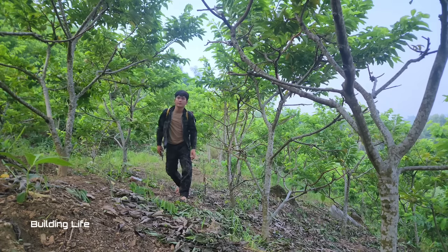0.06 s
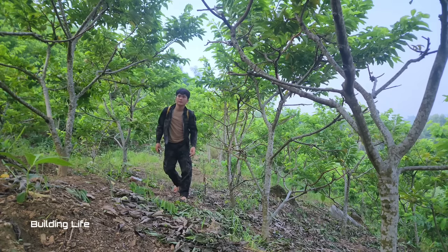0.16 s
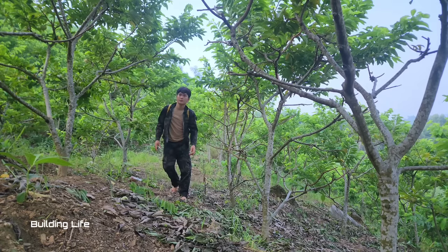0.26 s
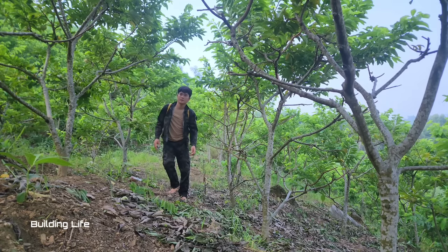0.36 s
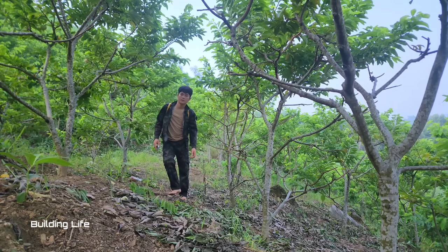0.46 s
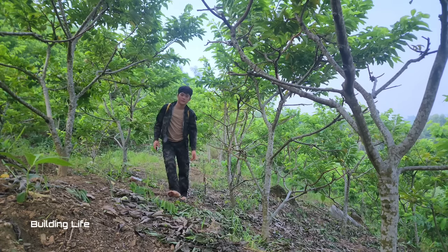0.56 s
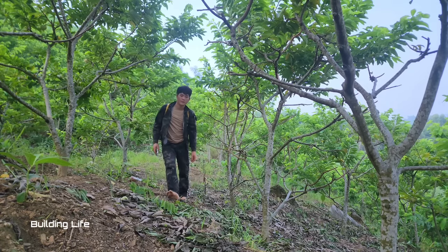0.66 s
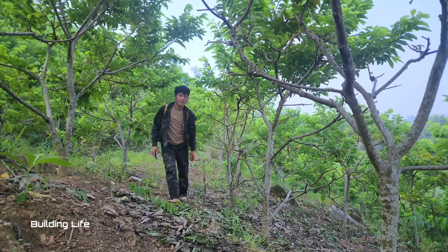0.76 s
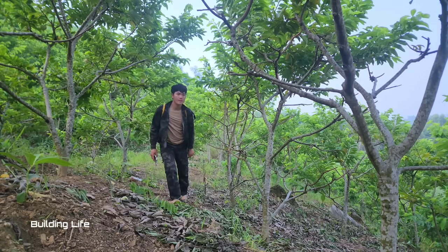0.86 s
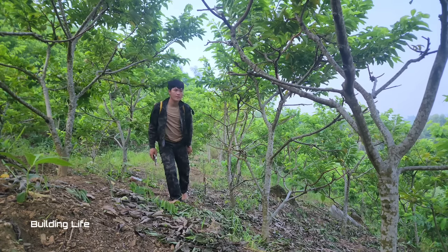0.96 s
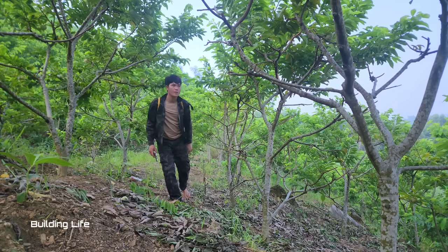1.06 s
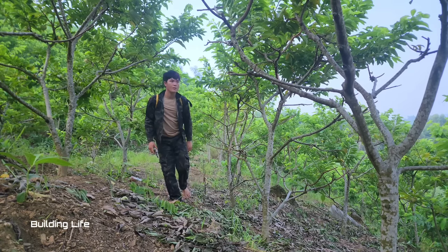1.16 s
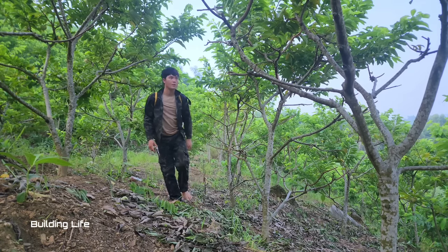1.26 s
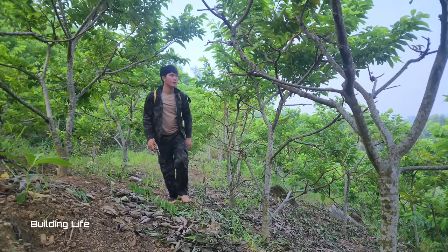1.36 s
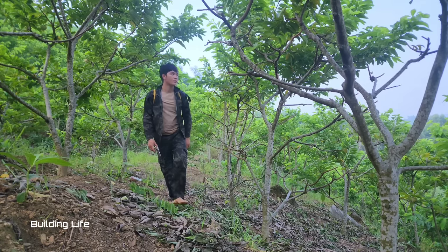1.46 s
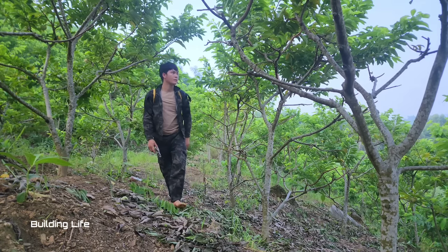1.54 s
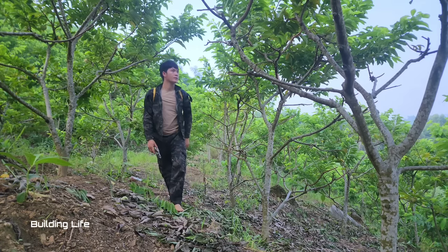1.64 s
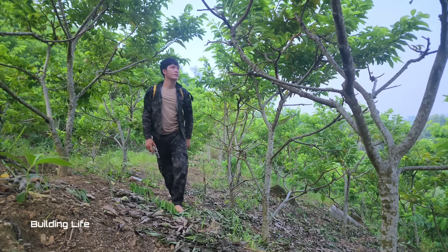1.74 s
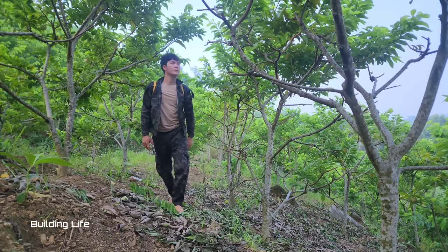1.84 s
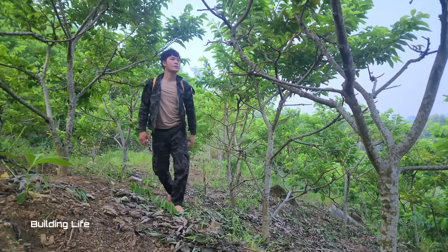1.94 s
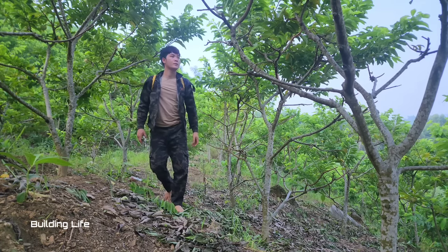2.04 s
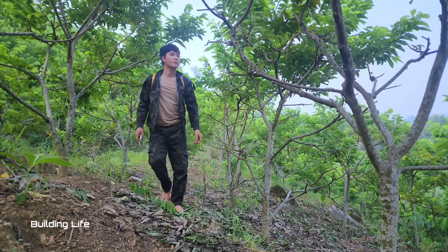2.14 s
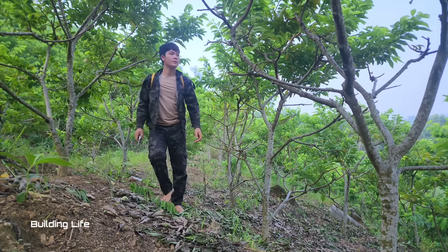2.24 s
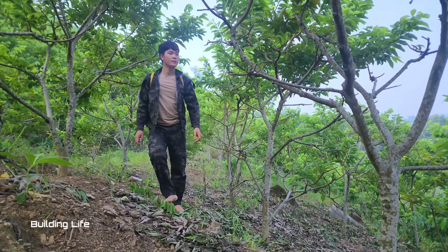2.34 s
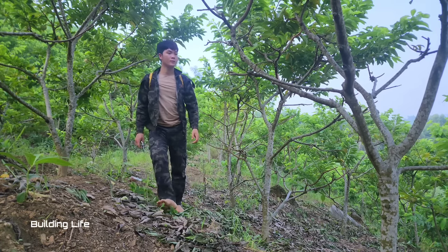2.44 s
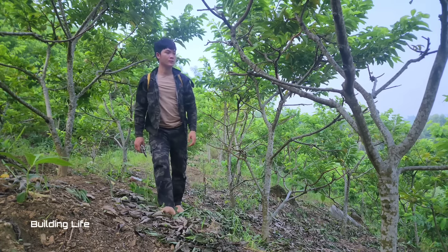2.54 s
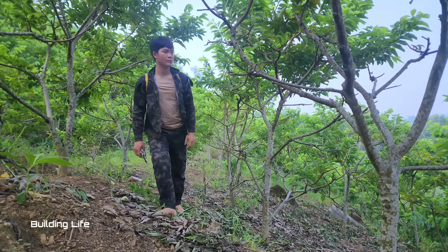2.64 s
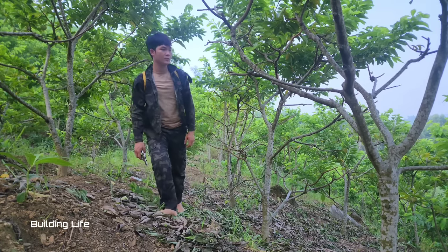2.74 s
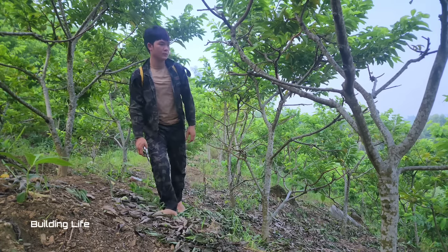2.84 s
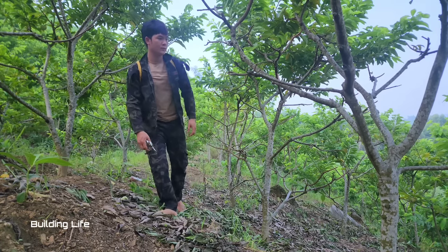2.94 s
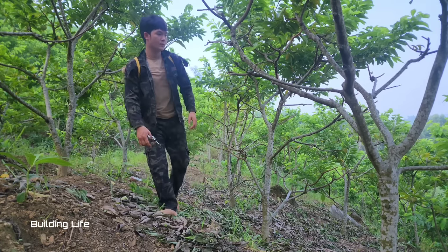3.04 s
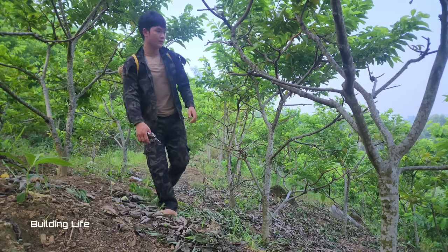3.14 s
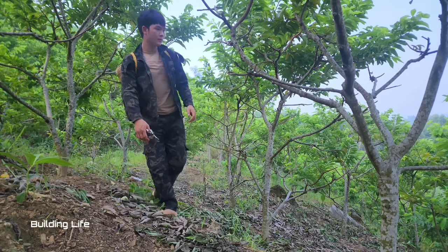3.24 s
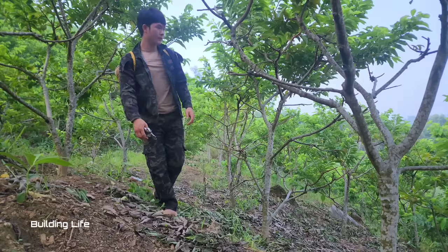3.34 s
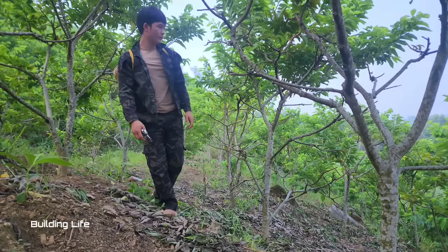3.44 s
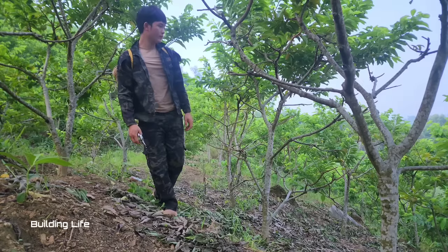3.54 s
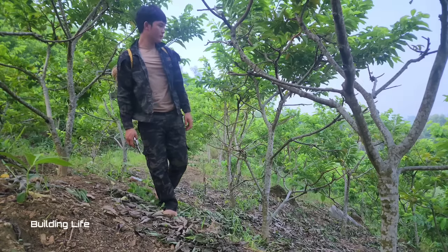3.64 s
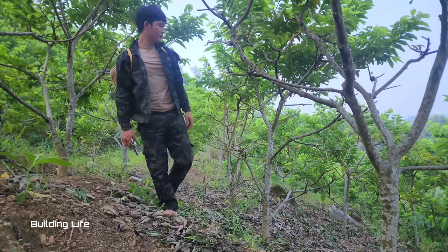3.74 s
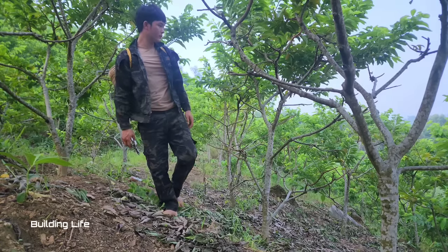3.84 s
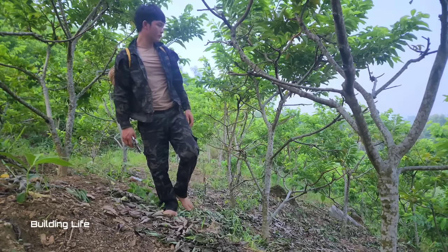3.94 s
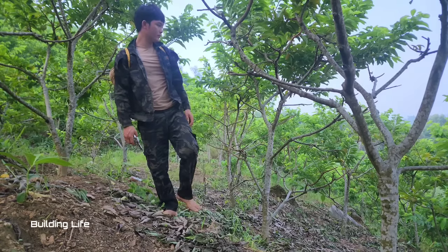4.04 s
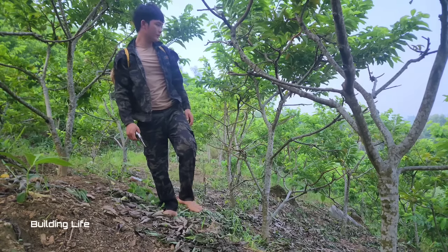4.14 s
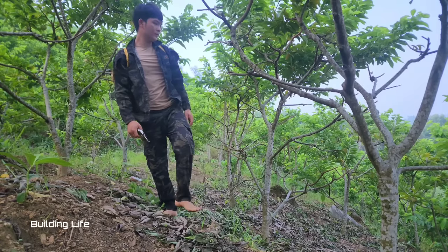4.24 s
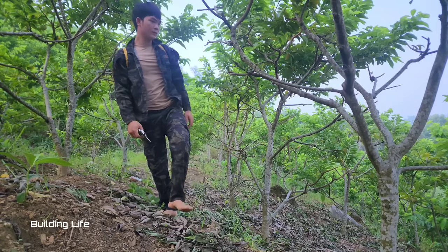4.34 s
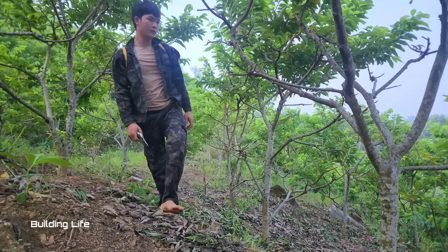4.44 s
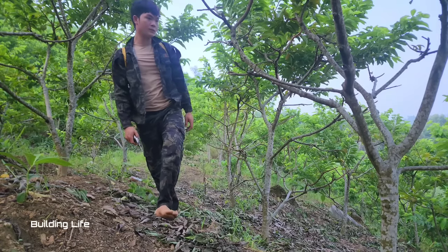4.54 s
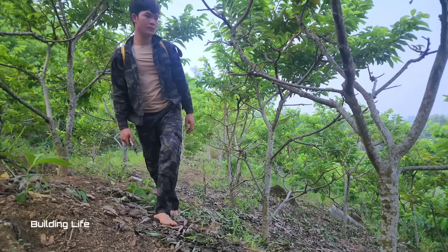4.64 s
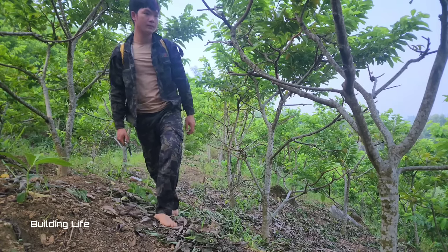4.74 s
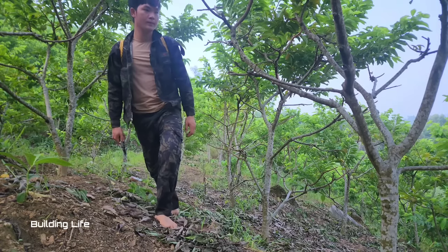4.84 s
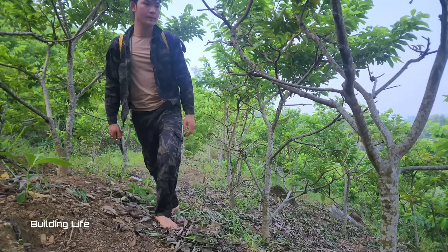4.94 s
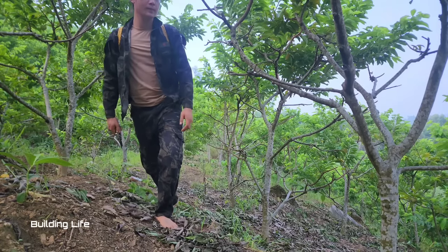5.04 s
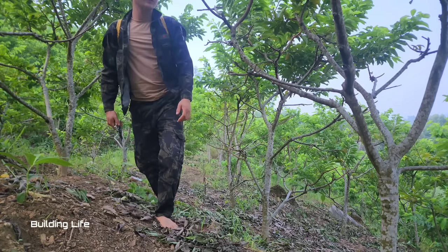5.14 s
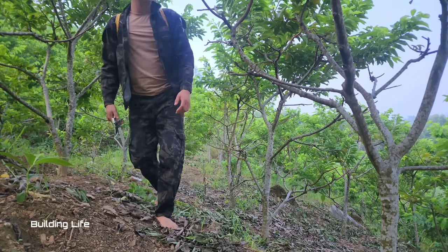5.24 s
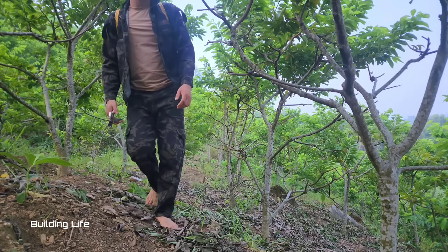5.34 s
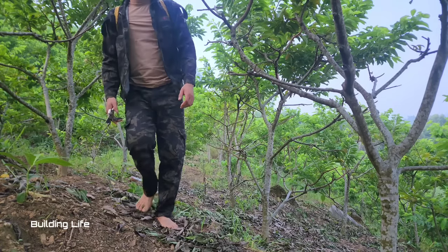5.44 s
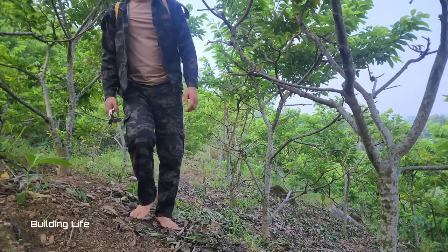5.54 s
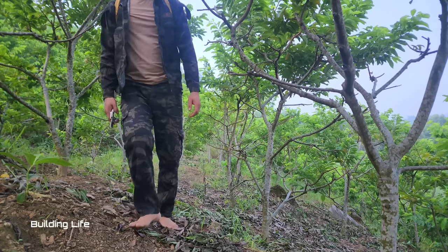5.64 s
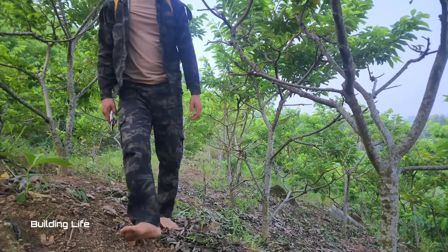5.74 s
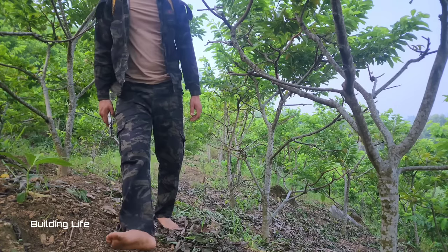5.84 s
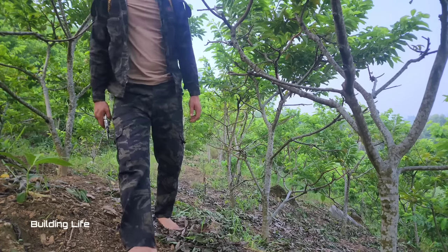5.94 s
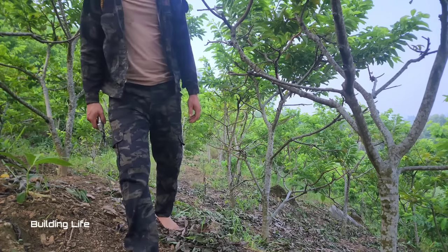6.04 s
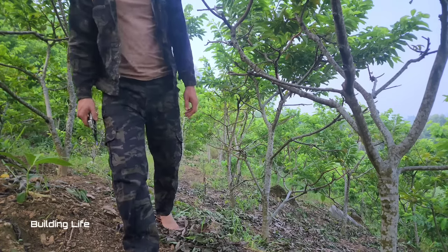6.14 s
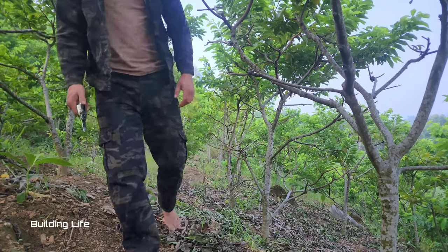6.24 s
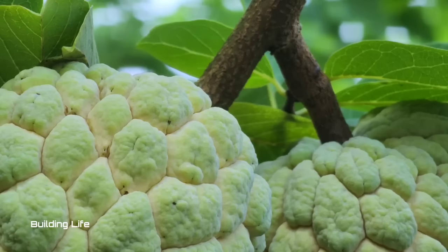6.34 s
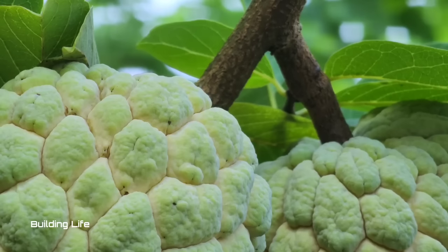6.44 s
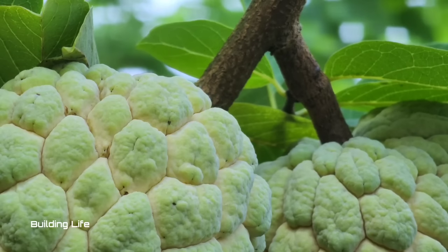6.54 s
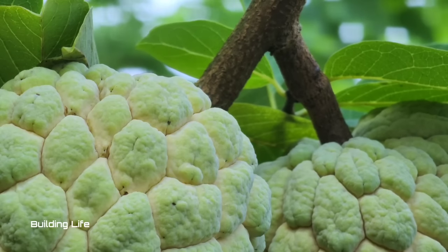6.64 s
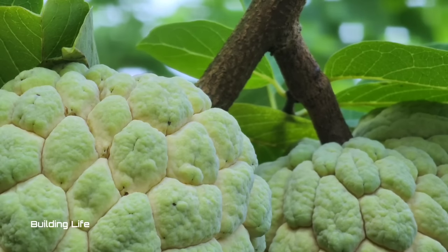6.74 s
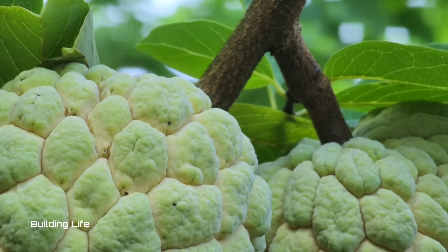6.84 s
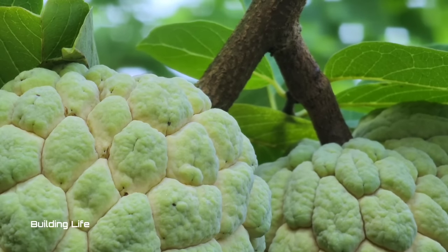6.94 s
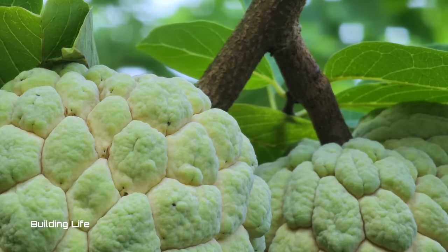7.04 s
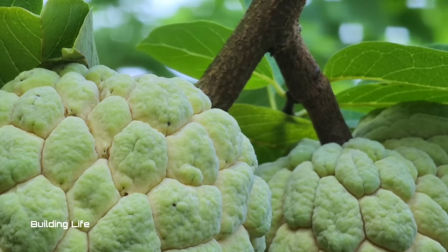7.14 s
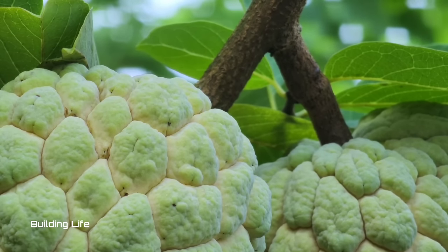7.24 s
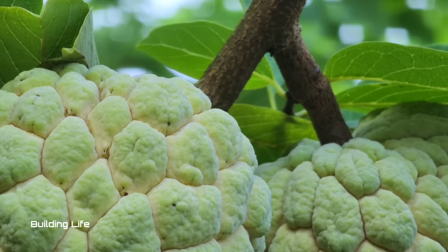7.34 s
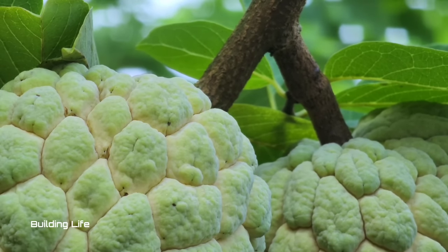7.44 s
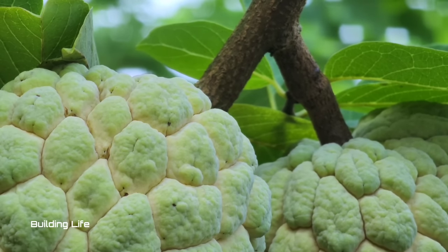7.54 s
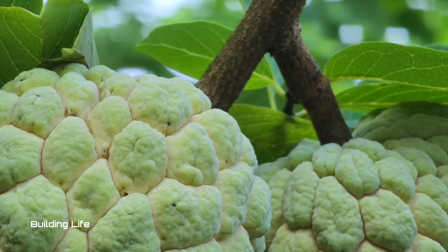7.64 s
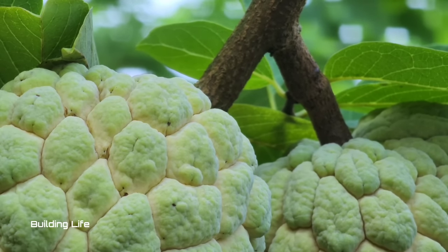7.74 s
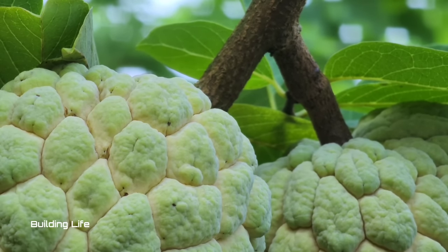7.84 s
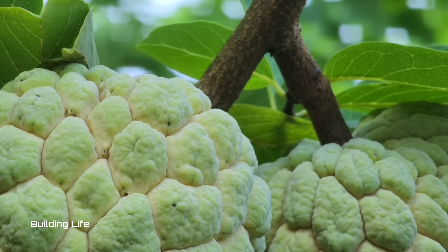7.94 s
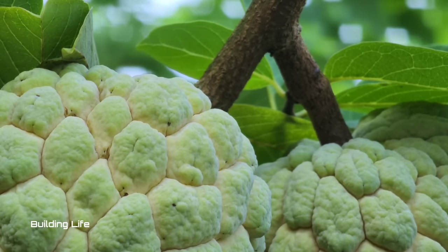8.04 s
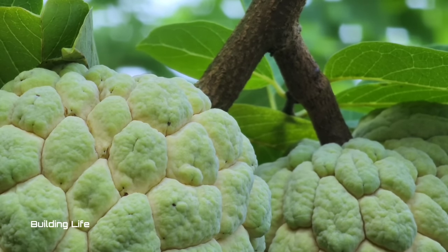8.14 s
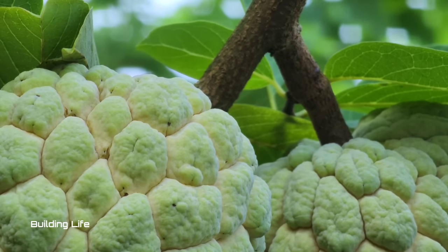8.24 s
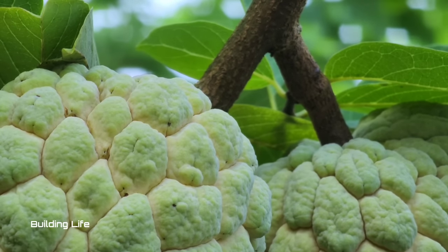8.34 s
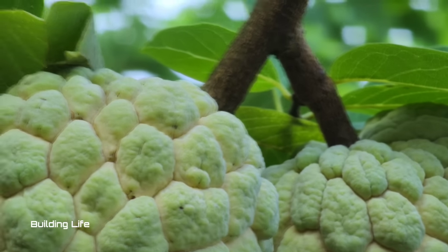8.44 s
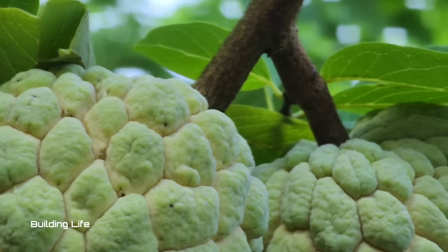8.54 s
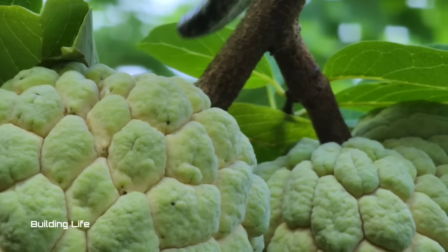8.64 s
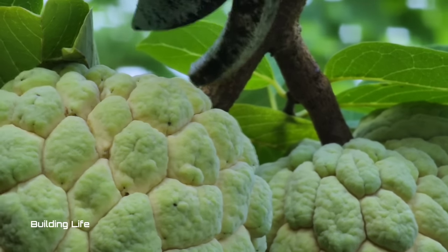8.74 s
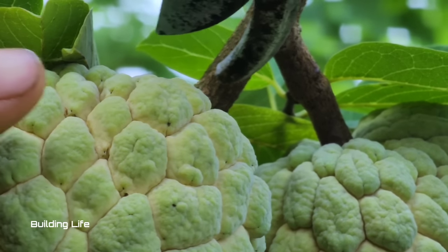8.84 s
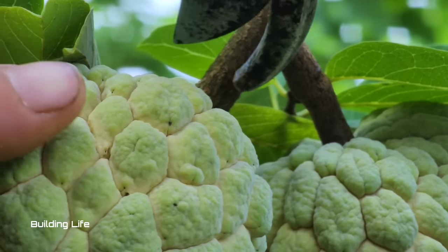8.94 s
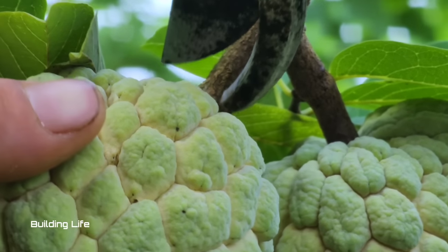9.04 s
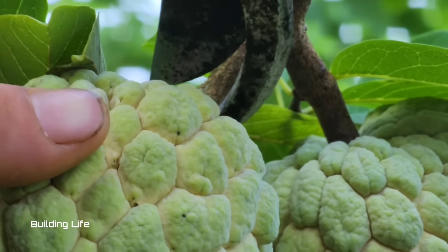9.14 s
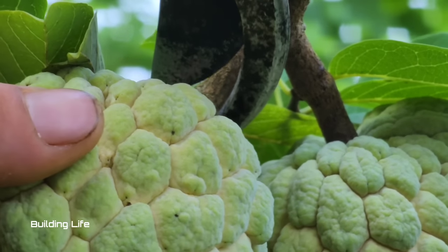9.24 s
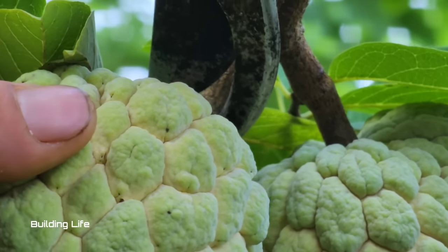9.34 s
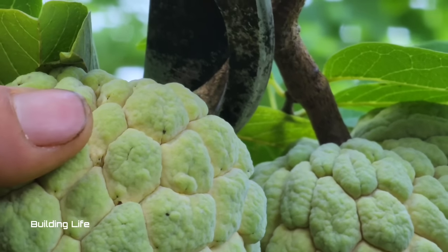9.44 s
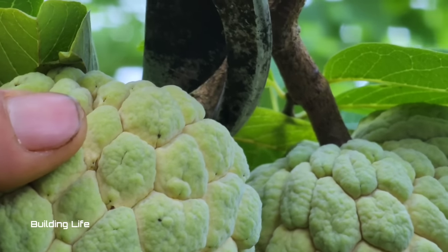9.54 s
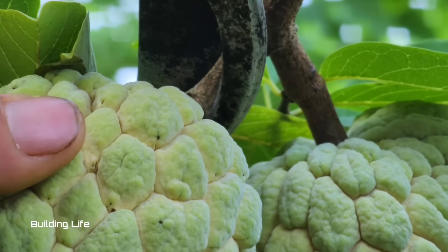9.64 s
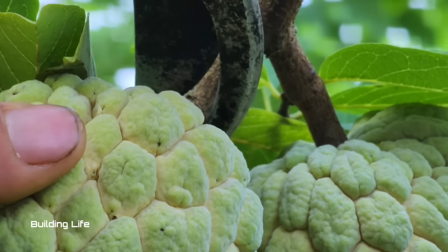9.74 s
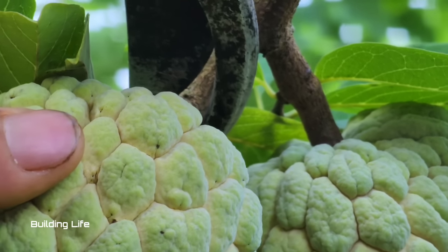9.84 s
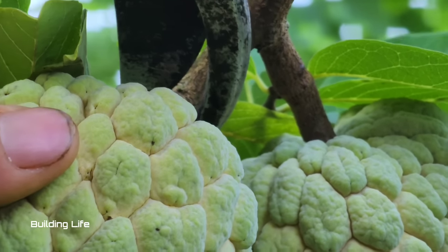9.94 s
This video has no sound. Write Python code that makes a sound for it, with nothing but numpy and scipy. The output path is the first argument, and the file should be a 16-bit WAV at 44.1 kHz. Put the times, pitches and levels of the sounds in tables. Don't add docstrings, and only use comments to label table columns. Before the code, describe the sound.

A fixed stereo microphone in an orchard hears a continuous high cricket drone while someone walks towards it over leaf litter, each step crunchier and kicking small clods. Faint bird whistles and a brief twitter sit far behind. Abruptly the place is closer: two near crickets trill, wind buffets gently, foliage rustles, twigs and pruning blades snap, and a low thump shakes the microphone.

```python
import sys
import numpy as np
from scipy import signal
from scipy.fft import rfft, irfft, next_fast_len
from scipy.io import wavfile
from scipy.ndimage import uniform_filter1d

SR = 44100
rng = np.random.default_rng(int(sys.argv[2]) if len(sys.argv) > 2 else 0)


def ratio(d):
    e = np.asarray(d, float) / 20
    return 10 ** e


def file_out(sig):
    cols = np.atleast_2d(sig).T
    lim = np.clip(cols, -1, 1)
    pcm = np.round(lim * 32767).astype(np.int16)
    wavfile.write(sys.argv[1], SR, pcm)


N = 440547
STEP = 4
MOVE_S = 6.46

# (frequency [Hz], level [dB])
DULL = [(120, -15.5), (300, 1), (700, 4.5), (1500, 6.5), (2500, 4), (4500, -4), (8000, -43)]


def evened(x):
    return x / np.sqrt(np.mean(x ** 2) + 1e-20)


def curves(rows, t):
    s, *columns = np.transpose(rows)
    return [np.interp(t, s, column) for column in columns]


def coloured(x, points):
    f, level_db = np.transpose(points)
    size = next_fast_len(x.shape[-1])
    hz = np.fft.rfftfreq(size, 1 / SR)
    gain = ratio(np.interp(np.log(hz + 1), np.log(f), level_db))
    return irfft(rfft(x, size) * gain, size)[..., :x.shape[-1]]


def drift(per_s, size=N, step=1):
    knots = rng.standard_normal(int(size * step / SR * 40) + 9)
    place = np.arange(size) * step / SR * min(per_s, 39)
    return np.interp(place, np.arange(len(knots)), knots)


def add(mix, s, sound, pan_db=0, late_ms=0):
    for port, side in enumerate((.5, -.5)):
        start = max(round((s - side * late_ms / 1000) * SR), 0)
        part = mix[port, start:][:len(sound)]
        part += ratio(side * pan_db) * sound[:len(part)]


def foliage(x, t60, wet_db, count=1):
    t, out = np.arange(int(.25 * SR)) / SR, x.copy()
    for k in range(count):
        taps = rng.standard_normal((2, len(t))) * (rng.random((2, len(t))) < .05)
        taps *= ratio(-60 * t / t60) * (t > .003)
        taps /= np.linalg.norm(taps, axis=1, keepdims=True)
        turn = 1
        if count > 1:
            turn = np.sqrt(2 / count) * np.cos(np.pi * (k / count + 1.3 * np.arange(N) / SR))
        out += ratio(wet_db) * signal.oaconvolve(x * turn, taps, axes=1)[:, :N]
    return out


def swells(rows, depth_db, roundness):
    t, power = np.arange(N // STEP + 1) * STEP / SR, 0
    for s, db, tint_db, rise, fall in rows:
        away = np.where(t < s, (s - t) / rise, (t - s) / fall)
        peak = ratio([[2 * db], [2 * (db + tint_db)]])
        power = power + peak * ratio(-2 * np.minimum(depth_db * away ** roundness, 90))
    return np.repeat(power, STEP, axis=1)[:, :N]


def stridulate(hz, per_s, level, duty, sag, blur_hz, overtones=(), weaker=0, count=1, ragged=1):
    stroke = (np.cumsum(per_s) * STEP / SR + ragged * rng.random()) % 1 * count
    along = np.clip(stroke % 1 / duty, 0, 1)
    teeth = uniform_filter1d(rng.standard_normal((2, len(along))), 16) * 4
    pitch = hz * (1 - sag * (along - .5)) + blur_hz * teeth[0]
    arch = 4 * along * (1 - along)
    fading = np.clip(1 - weaker * np.floor(stroke), 0, 1)
    level = level * arch * fading * (1 + 0.22 * teeth[1])
    turn = 2 * np.pi * np.cumsum(np.repeat(pitch, STEP)) / SR
    tone = np.sin(turn) + sum(ratio(db) * np.sin(k * turn) for k, db in overtones)
    return tone * uniform_filter1d(np.repeat(level, STEP), STEP)


def chorus(hz, spread_hz, per_s, duty, sag, blur_hz, fade_db, swell_db, weaker=0, count=6, size=1):
    out, n = np.zeros((2, N)), N // STEP
    for k, (pace, pan, late) in enumerate(rng.uniform(-1, 1, (count, 3))):
        pitch = hz + spread_hz * (np.sin(2.4 * k) + .3 * drift(3, n, STEP))
        pace = per_s * (1 + .05 * pace + .03 * drift(2, n, STEP))
        level = ratio(swell_db * drift(6, n, STEP) - fade_db * k)
        singer = stridulate(pitch, pace, level, duty, sag, blur_hz, (), weaker, size)
        add(out, 0, singer, 4 * pan, .12 + .3 * late)
    return evened(out)


def bouts(rows, rise, fall, ends_db, slow=1):
    corners = []
    for s, length, db, per_s in rows:
        end = s + length
        corners += [(s, db + ends_db, slow * per_s), (s + rise, db, per_s)]
        corners += [(end - fall, db, per_s), (end, db + ends_db, slow * per_s)]
    return corners


def soloist(rows, hz, duty, sag, blur_hz, overtones, pan_db, weaker=0, count=1):
    mix, t = np.zeros((2, N)), np.arange(rows[0][0], rows[-1][0], STEP / SR)
    level_db, per_s = curves(rows, t)
    level = ratio(level_db + 1.5) * signal.windows.tukey(len(t), 0.02 / (t[-1] - t[0]))
    pitch = hz + 25 * drift(3.6, len(t), STEP)
    song = stridulate(pitch, per_s, level, duty, sag, blur_hz, overtones, weaker, count, ragged=0)
    add(mix, t[0], song, pan_db, .085)
    return mix


def choirs():
    # (time [s], level [dB])
    high = [(0.0, -61.5), (0.5, -55), (1.0, -57), (1.7, -56), (2.2, -64.5), (2.89, -57.5), (3.5, -58.5),
            (3.8, -61.5), (4.3, -57.5), (5.0, -62), (5.6, -59.5), (6.37, -59.5), (6.84, -49), (7.23, -55),
            (7.6, -50), (8.18, -54), (9.2, -46.5), (9.42, -52.5)]
    # (time [s], level [dB])
    low = [(0.0, -66.5), (0.5, -61.5), (2.09, -64.5), (2.59, -62.5), (3.45, -66.5), (3.81, -62),
           (4.28, -65.5), (4.5, -63.5), (5.15, -68.5), (5.67, -60.5), (6.37, -66), (6.84, -56.5),
           (7.51, -62.5), (8.18, -57.5), (9.21, -59), (9.99, -63)]
    t = np.arange(N) / SR
    far = t < MOVE_S
    low_db = curves(low, t)[0]
    high_db = curves(high, t)[0] + 4.5 * np.clip((t - 9.55) / 0.036, 0, 1)
    high_db = high_db + 0.6 * drift(6.3) - 2 * (np.arange(N) > MOVE_S * SR)
    thin_db = -65.5 + 0.11 * (low_db - low_db.mean())
    out = ratio(high_db) * chorus(4810, 200, 23, .75, 0.083, 44.92, 1.26, 1.7, 0.47, count=7, size=3)
    close = np.arange(N // STEP) * STEP / SR > MOVE_S
    low_hz, low_spread_hz = 3360 + 130 * close, 250 - 90 * close
    out += ratio(low_db) * chorus(low_hz, low_spread_hz, 28, .85, 0.066, 45.4, 0.25, 3.65, count=7)
    drone = chorus(7370, 60, 17.5, 0.81, 0.03, 70, 1.2, 2.2, 0.22, count=3, size=3)
    out += ratio(thin_db - 5.0 + 3.0 * far) * drone
    out += ratio(thin_db - 3.0 - 4.2 * far) * chorus(7560, 80, 8.7, 0.36, 0.087, 89.9, 3.6, 1.7, count=3)
    out += ratio(thin_db - 20) * chorus(8400, 90, 9, 0.3, 0.03, 40, 1.5, 5, count=2)
    out += ratio(thin_db - 10.5) * ~far * chorus(6790, 13.9, 24, 1.0, 0.016, 24.8, 3, 2.0, count=1)
    return out


def far_soloists():
    # (start [s], length [s], level [dB], groups [1/s])
    leader = [
        (.2, 1.73, -55.5, 24.6),
        (2.55, 1.1, -53, 23),
        (3.98, 0.8, -56, 25),
        (5.38, 1.04, -54, 26.7),
    ]
    # (start [s], length [s], level [dB], groups [1/s])
    partner = [
        (.25, 1.65, -57.5, 23.5),
        (2.6, 1.1, -59.5, 24),
        (4.0, 1.35, -60, 24.5),
        (5.5, .9, -62, 24),
    ]
    # (start [s], length [s], level [dB], pulses [1/s])
    basso = [
        (.3, .6, -62, 19.3),
        (1.2, 0.98, -63.5, 19.3),
        (2.5, 0.53, -63, 19),
        (3.65, .7, -63.5, 22),
        (5.45, .7, -65, 19.4),
    ]
    out = soloist(bouts(leader, 0.081, 0.13, -28), 4930, 0.85, .06, 25, [], 1, .5, count=3)
    out += soloist(bouts(partner, 0.092, 0.15, -20), 4680, 0.85, .06, 25, [], -1.5, .4, count=3)
    out += soloist(bouts(basso, 0.1, 0.12, -20), 3170, 0.55, .05, 25, [], 1.5)
    return out


def near_crickets():
    # (start [s], length [s], level [dB], pulses [1/s])
    trills = [
        (6.489, 0.37, -45, 30),
        (7.893, 0.53, -42, 31),
        (8.89, 0.62, -42.5, 31),
        (9.5, .17, -49, 30),
    ]
    # (start [s], length [s], level [dB], groups [1/s])
    neighbour = [
        (6.6, 0.59, -58, 22.6),
        (7.46, 0.76, -43, 25.3),
        (8.38, 0.19, -45, 24.6),
        (8.68, 0.54, -46.5, 23.4),
        (9.17, 0.13, -42, 24),
        (9.335, .115, -41, 26),
        (9.551, 0.11, -41.5, 25.7),
        (9.742, 0.39, -40.5, 27),
    ]
    near = np.zeros((2, N))
    for bout in trills:
        corners = bouts([bout], 0.099, 0.18, -21, slow=.8)
        near += soloist(corners, 3550, 0.92, 0.08, 15.5, [(2, -25), (3, -25.0)], 4.1)
    for bout in neighbour:
        corners = bouts([bout], 0.015, 0.033, -30)
        near += soloist(corners, 4810, 1.0, 0.0626, 39.6, [(2, -23.5)], -5.0, 0.57, count=3)
    return near


def crickets():
    near = near_crickets()
    scattered = foliage(choirs() + far_soloists() + .7 * near, 0.08, -4, count=3)
    return (scattered + .6 * near) * ratio(2.6)


def gusts():
    # (peak [s], level [dB], left-right [dB], rise [s], fall [s])
    blows = [
        (2.39, -82, 6, .3, 1),
        (1.65, -79, -4, 0.23, 0.12),
        (6.65, -68.5, 10.5, 0.11, 0.6),
        (7.12, -62, 4, 0.92, 0.41),
        (7.76, -64, 7, 0.53, 0.29),
        (8.07, -62, 8, 0.22, 0.66),
        (8.6, -59.5, 9, 0.55, 0.42),
        (9.18, -72.5, 3, 0.35, 0.17),
    ]
    close = np.arange(N) > MOVE_S * SR
    breeze_db, breeze_pan_db = np.where(close, -74, -85.5), np.where(close, 4, 2.5)
    breeze = ratio([2 * breeze_db, 2 * (breeze_db + breeze_pan_db)])
    level_db, leaning_db = 10 * np.log10(swells(blows, 17.5, 0.98) + breeze)
    return level_db, leaning_db - level_db


def weather():
    # (frequency [Hz], level [dB])
    gust = [(8.8, -31), (15, -3.5), (43, 1), (130, -1.5), (157, -5), (261, -15), (308, -13.5), (400, -18),
            (520, -24), (880, -120)]
    # (frequency [Hz], level [dB])
    air = [(200, -45), (500, -13.5), (2000, -11), (2700, -8), (3400, 16), (3900, -4), (4400, 16.5),
           (6000, -2), (6800, 4), (8300, -1.5), (10200, -11.5), (11000, -27.5), (15300, -15.5),
           (15700, -64)]
    level_db, pan_db = gusts()
    shared, left, right = evened(coloured(rng.standard_normal((3, N)), gust))
    lumps_db = 4.5 * np.array([drift(12), drift(27)])
    wind_db = level_db + np.outer([.5, -.5], pan_db) + lumps_db
    wind = np.array([left + 0.99 * shared, right + 1.58 * shared]) * ratio(wind_db)
    wash = evened(coloured(rng.standard_normal((2, N)), [(100, -18)] + air))
    return ratio(1.5) * wind + ratio(-60 + 1.7 * drift(12)) * wash


def rustle():
    # (peak [s], crisp level [dB], weight [dB], rise [s], fall [s])
    treads = [(.83, -89, 18, 0.076, 0.12), (1.1, -70, 9, 0.058, 0.078), (1.54, -82.5, 15, 0.14, 0.4),
              (2.03, -71, -8, 0.053, 0.18), (2.335, -61, 6.5, 0.037, 0.17), (2.4, -62.5, 11.5, 0.064, 0.19),
              (2.61, -79.5, 17, 0.11, 0.087), (3.2, -60, 10, 0.088, 0.22), (3.28, -67, 6.5, 0.06, 0.047),
              (3.4, -88, 11, .1, 0.11), (3.81, -71, 9, 0.26, .17), (4.28, -78, -16, 0.037, 0.35),
              (4.68, -66.5, 11.5, 0.16, 0.047), (4.8, -81.5, 12, 0.068, .06), (4.92, -79.5, 13, 0.12, 0.16),
              (5.44, -58.5, 7, 0.11, 0.17), (5.76, -74.5, 7, .15, 0.32), (6.04, -65.5, 9, 0.13, 0.13),
              (6.13, -79, 23.5, 0.12, 0.21), (6.3, -71, 6.5, 0.14, 0.084), (6.41, -56, 17.5, 0.05, 0.055)]
    # (peak [s], crisp level [dB], weight [dB], rise [s], fall [s])
    brushes = [(6.65, -67.5, 14, 0.16, .1), (6.7, -60, 7, 0.066, 0.24), (7.15, -60.5, 3, 0.027, .2),
               (7.24, -58, -0.5, 0.12, 0.15), (7.4, -57.5, -27, 0.29, .12), (7.48, -57, -7, 0.056, 0.27),
               (8.12, -72, 13, 0.074, 0.28), (8.21, -55, -8, 0.04, 0.089), (8.485, -65, 9, 0.14, 0.031),
               (8.56, -73, 17.5, 0.1, 0.3), (8.739, -62, 0.5, 0.086, 0.31)]
    after = np.arange(N) / SR - MOVE_S
    rest_db = np.where(after > 0, -65 - 2.5 * after, -89.5)
    rest_db = rest_db + np.outer([0, 1], np.where(after > 0, 6, -6))
    return 10 * np.log10(swells(treads + brushes, 25, 1.11) + ratio(2 * rest_db))


def leaves():
    # (frequency [Hz], level [dB])
    crisp = [(1200, -33), (2500, -12.5), (5000, -4.5), (8000, -9), (11500, -11), (15300, -11), (15700, -65)]
    crisp_db, dull_db = rustle()
    tread = np.clip((dull_db - crisp_db + 0.5) / 9, .15, 1)
    tread = tread * np.where(np.arange(N) > MOVE_S * SR, 0.71, 1)
    cracks = rng.standard_normal((2, N)) * ratio(3.1 * np.minimum(rng.exponential(1, (2, N)), 2.1))
    cracks *= rng.random((2, N)) < .012
    splinter = rng.standard_normal((1, 256)) * ratio(-60 * np.arange(256) / SR / .008)
    cracks = signal.oaconvolve(cracks, splinter, axes=1)[:, :N] * rng.standard_normal((2, N))
    scatter = 1.47 * rng.standard_normal((2, N))
    cracks = (tread * evened(cracks) + scatter) * ratio(1.64 * tread * drift(38))
    cracks += 0.037 * cracks[::-1]
    bright = ratio(crisp_db + 10) * evened(coloured(cracks, crisp))
    thud = ratio(dull_db - 5.5 + 3.6 * tread * drift(37)) * evened(coloured(cracks, DULL))
    return bright + thud


def birds():
    # (start [s], length [s], top [Hz], level [dB])
    whistles = [
        (.89, .235, 2980, -74),
        (3.44, .14, 2700, -84),
        (4.255, .2, 2930, -76),
        (7.68, .29, 2900, -66),
        (9.07, .21, 2930, -72),
    ]
    # (start [s], length [s], pitch [Hz], level [dB])
    pipes = [
        (4.125, 0.065, 2900, -74),
        (4.2, .07, 2920, -80),
        (.78, .12, 2900, -79),
        (8.97, .11, 2900, -73),
        (7.434, 0.056, 2830, -60),
        (2.17, 0.054, 2700, -86),
        (1.44, .07, 2550, -82),
    ]
    # (time [s], overtone [dB], fundamental [dB])
    twitter = [
        (4.415, -69, -58),
        (4.4523, -54, -48.5),
        (4.493, -51, -46.5),
        (4.53, -52, -46),
        (4.568, -51, -44.5),
        (4.6082, -53, -47.5),
        (4.655, -60, -56),
    ]
    out = np.zeros((2, N))
    for k, (s, length, top_hz, level_db) in enumerate(whistles + pipes):
        u = np.linspace(0, 1, int(length * SR))
        fall = u - 0.15 * np.sin(2 * np.pi * u) / (2 * np.pi)
        hz = top_hz - (top_hz - 2060) * fall * (k < len(whistles))
        flutter_db = 2.5 * drift(39, len(u))
        turn = 2 * np.pi * np.cumsum(hz + 30 * drift(28.8, len(u))) / SR
        note = ratio(flutter_db) * np.sin(turn) * signal.windows.tukey(len(u), .3)
        add(out, s, ratio(level_db + 5) * note, 1.5, .05)
    u = np.linspace(0, 1, int(0.0203 * SR))
    turn = 2 * np.pi * np.cumsum(3450 - 420 * u) / SR
    for s, overtone_db, level_db in twitter:
        note = ratio(level_db) * np.sin(turn) + ratio(overtone_db - 1.5) * np.sin(2 * turn)
        add(out, s, note * np.sin(np.pi * u), 1.5, .05)
    return foliage(out, .12, -12)


def bumps():
    # (time [s], peak [dB], brightness [dB], left-right [dB])
    knocks = [(0.829, -63.5, -8, 11), (7.198, -54.5, 6, 14), (7.744, -42.5, 3, 8), (8.478, -30, 7, 12),
              (8.484, -29, 16, 16), (8.491, -28, 6.5, 11), (8.493, -31.5, 0.5, -15), (8.501, -28.5, 2, 19),
              (8.527, -31, -5, 11.5), (8.551, -35, 0.5, -15), (8.555, -29, 2, 18.5), (8.575, -35, -2, 9),
              (8.593, -36, -5, 14)]
    # (frequency [Hz], level [dB], t60 [s])
    mount = [(51.6, -2, 0.19), (93, 6.5, 0.12), (207.6, 3, 0.072), (165, -5.5, 0.081), (70, 3, 0.14),
             (343, -10.5, 0.072), (409, -40, 0.021), (527, -11, 0.049), (665, -13, 0.027),
             (803, -17, 0.035), (1026, -16.5, 0.027)]
    out, t = np.zeros((2, N)), np.arange(8192) / SR
    for s, peak_db, bright_db, pan_db in knocks:
        ring = np.zeros(len(t))
        for (hz, db, t60), detune in zip(mount, rng.uniform(0.868, 1.086, len(mount))):
            tilt_db = bright_db * np.log2(min(hz, 500) / 96)
            ring += ratio(db + tilt_db - 60 * t / t60) * np.sin(2 * np.pi * hz * detune * t)
        knock = ratio(peak_db + 8) * ring / abs(ring).max() * np.minimum(t / 0.0058, 1)
        add(out, s + 0.00179, knock, pan_db, .95)
    return out * [[1], [-1]]


def snaps():
    # (time [s], peak [dB], ring [Hz], left-right [dB])
    twigs = [(1.4545, -63, 3400, 8.5), (2.022, -68, 1430, -2), (4.2749, -58.5, 3400, -3.5),
             (5.713, -73, 2540, 18), (5.741, -56, 1460, 3.5), (5.96, -60, 1550, 8), (6.638, -53, 1340, 0.5),
             (6.6742, -45.5, 2260, -3.5), (6.695, -37.5, 1410, -6.5), (6.7734, -59, 2300, -1),
             (7.6986, -52, 1560, 1.5), (7.7792, -51.5, 1300, 2), (7.6536, -58, 3400, 2.5),
             (7.745, -58, 1500, 4), (6.4857, -65, 1300, 1), (2.3202, -60, 1500, 0), (8.1923, -29, 1890, 7),
             (8.2004, -43, 3500, 4.5), (8.2035, -47, 3500, 3), (8.735, -38, 1980, 4),
             (6.7006, -46, 1990, -5), (6.7065, -48, 2000, -3), (7.1434, -53, 2000, 3.5),
             (9.376, -65, 2654, 3), (9.458, -65, 2600, 1), (9.58, -66, 2600, 2), (9.62, -69.5, 2600, -2),
             (9.777, -66, 2600, -2), (9.9146, -71, 2600, -6)]
    # (frequency [Hz], level [dB])
    snap = [(500, -49), (1500, -17), (4300, 8), (5900, 4.5), (7800, 5), (12000, 2), (15500, 0),
            (16500, -68)]
    out, t = np.zeros((2, N)), np.arange(2048) / SR
    for s, peak_db, hz, pan_db in twigs:
        fibres = .12 * ratio(-60 * t / .04)
        crack = rng.standard_normal(len(t)) * (ratio(-60 * (t / .0045) ** 2) + fibres)
        crack = coloured(np.append(crack, np.zeros(512)), snap)[:len(t)]
        ring = 0.45 * np.sin(2 * np.pi * hz * t) * ratio(-60 * t / 0.018)
        sound = ratio(peak_db + 8.0) * (crack + ring) * np.minimum(t / 0.00031, 1)
        add(out, s, sound, pan_db, 0.13 * pan_db)
    return foliage(out, 0.05, -15)


def motor():
    # (peak [s], level [dB], tint [dB], rise [s], fall [s])
    passage = [
        (2.7, -89, 0, 1.3, 2.15),
    ]
    # (multiple of the shaft rate, level [dB])
    orders = [(5, 5.5), (6, 2.5), (7, -7)]
    turn = 2 * np.pi * np.cumsum(30.6 * (1 + 0.03 * drift(6))) / SR
    hum = sum(ratio(db + 5.3 * drift(7)) * np.sin(k * turn) for k, db in orders)
    return hum * np.sqrt(swells(passage, 8.8, 2.2)[0])


def clods():
    # (time [s], peak [dB], ring [Hz], t60 [s], left-right [dB])
    kicks = [(2.333, -49, 420, 0.024, 3), (2.366, -52, 1050, .03, 6), (2.417, -47, 790, .03, 5),
             (2.509, -53, 1330, .02, 5), (2.599, -67, 330, 0.1, 8), (3.183, -51, 1090, .04, 5),
             (3.206, -49, 926, 0.056, 6), (3.227, -50, 700, .04, 3), (3.243, -49, 1400, .03, 6),
             (5.408, -54, 2100, .03, 8), (5.428, -50, 1635, 0.05, 6), (4.938, -70, 1420, 0.056, 9),
             (6.049, -38, 1270, 0.019, 6), (6.108, -38, 850, 0.044, 5), (6.141, -39.5, 830, 0.045, 4.5),
             (6.197, -42, 1480, 0.024, 3), (6.286, -51, 584, 0.022, 5.5), (6.372, -41.5, 777, 0.1, 3),
             (6.378, -35, 1360, 0.045, 1.5), (6.411, -46, 727, 0.057, 11), (6.485, -40, 237, 0.076, 0),
             (6.503, -42.5, 251, 0.067, 2), (6.366, -46, 882, .05, 6), (6.486, -36.5, 620, 0.041, 1),
             (8.479, -39.5, 1240, 0.06, 4), (8.492, -42, 530, .05, 3), (7.779, -40.5, 1300, .015, 2),
             (7.779, -47, 305, .03, 4), (6.9, -50, 480, 0.049, 4), (6.11, -50, 360, .05, 5),
             (6.146, -48, 400, 0.076, 5), (6.375, -51, 340, 0.072, 5), (6.31, -55, 500, .02, 4),
             (6.055, -57, 260, .05, 5), (2.085, -66, 610, .03, 4), (4.635, -60, 2100, .03, 5),
             (4.67, -54, 2270, 0.045, 9), (4.2, -64, 1600, .04, 5), (4.905, -66, 1830, .04, 5),
             (8.554, -40, 572, 0.041, 1)]
    out, t = np.zeros((2, N)), np.arange(4096) / SR
    for s, peak_db, hz, t60, pan_db in kicks:
        grit = evened(coloured(rng.standard_normal(len(t)), DULL))
        turn = 2 * np.pi * hz * np.cumsum(1 + 0.092 * drift(39, len(t), 8)) / SR
        ring = np.sin(turn) + 0.32 * np.sin(1.7 * turn)
        body = 0.53 * ring + 0.44 * grit * min(hz / 900, 1) ** 2
        add(out, s, ratio(peak_db - 60 * t / t60) * body * np.minimum(t / 0.0013, 1), pan_db, .1)
    return foliage(out, 0.035, 0.87)


def scene():
    return crickets() + weather() + leaves() + birds() + bumps() + snaps() + motor() + clods()


def masked(dry):
    # (frequency [Hz], share [0-1])
    emptied = [(1200, .03), (1800, .18), (2700, .36), (2950, 0), (3800, 0), (4000, .05), (4200, 0),
               (5400, 0), (5700, .14), (6000, .3), (6400, 0), (8400, .03), (8900, .12), (10200, .14),
               (10800, .45), (11500, .5), (12000, .22), (12500, .15), (15000, .15)]
    hz, t, z = signal.stft(dry, SR, nperseg=1024)
    power = uniform_filter1d((abs(z) ** 2).sum(0), 4, axis=0)
    power = uniform_filter1d(power, 4, axis=1)
    whim = uniform_filter1d(rng.standard_normal((len(hz) // 3 + 1, len(t) // 2 + 1)), 3)
    whim = np.kron(whim, np.ones((3, 2)))[:len(hz), :len(t)]
    depth = power / power[hz > 2800].max(0) * ratio(19 * evened(whim))
    rank = depth.argsort(1).argsort(1) / len(t)
    kept = rank >= np.interp(hz, *np.transpose(emptied))[:, None]
    return signal.istft(z * np.where(kept, 1, .008), SR, nperseg=1024)[1][:, :N]


def top_cut(x):
    return signal.sosfilt(signal.butter(12, 16670, fs=SR, output="sos"), x)


def record(dry):
    mix = masked(dry)
    return top_cut(mix)


dry = scene()
out = record(dry)
file_out(out)
```